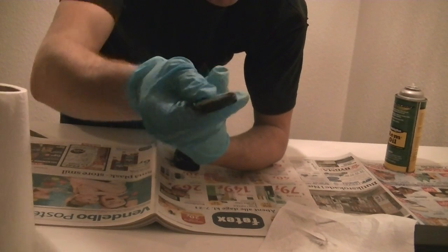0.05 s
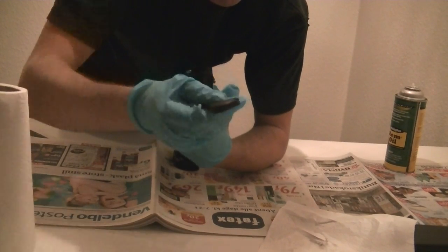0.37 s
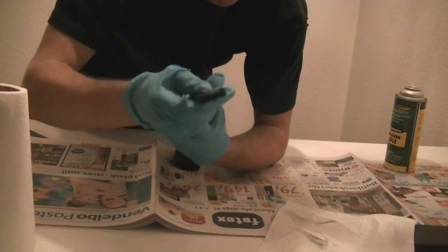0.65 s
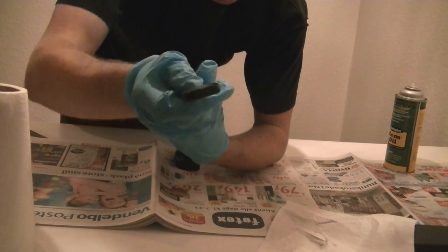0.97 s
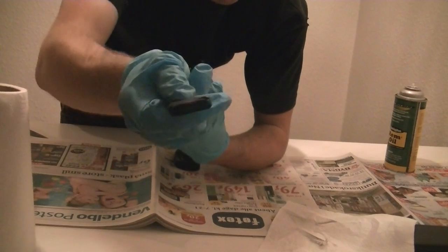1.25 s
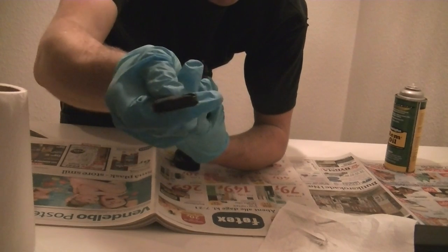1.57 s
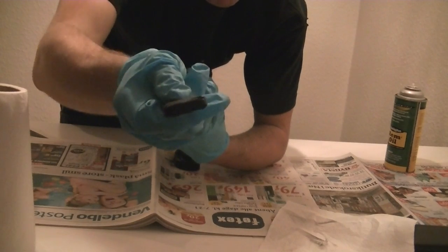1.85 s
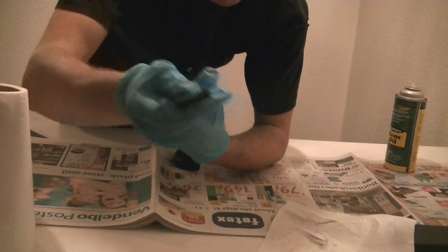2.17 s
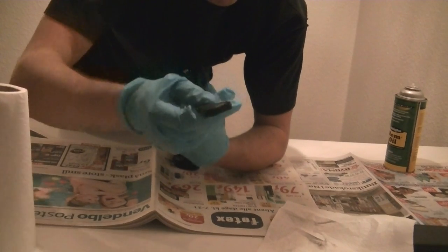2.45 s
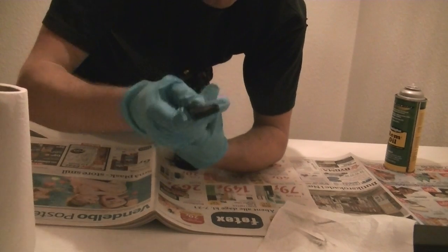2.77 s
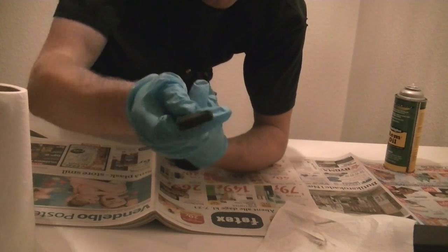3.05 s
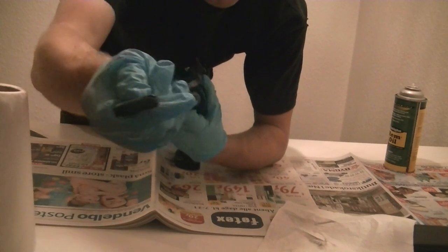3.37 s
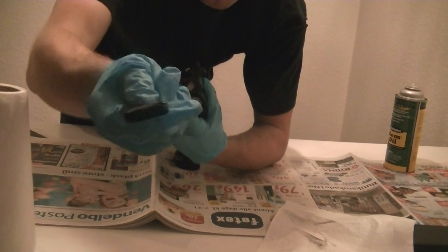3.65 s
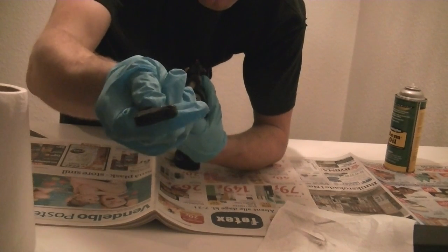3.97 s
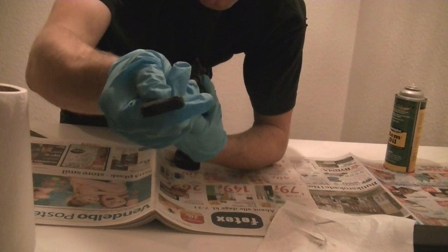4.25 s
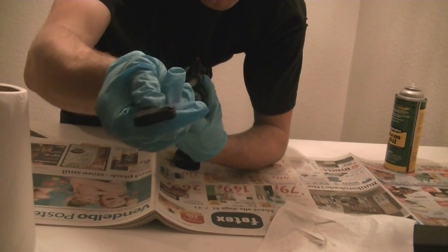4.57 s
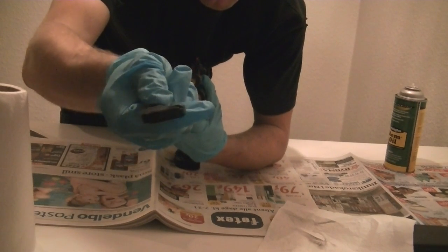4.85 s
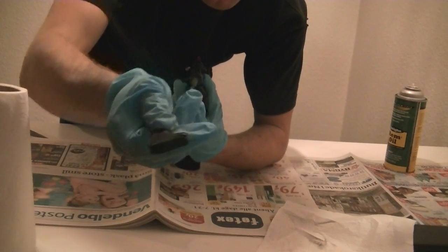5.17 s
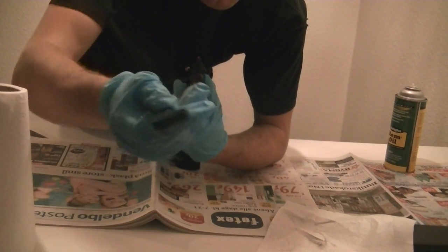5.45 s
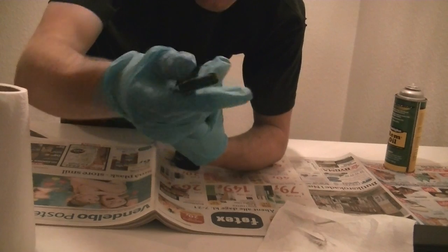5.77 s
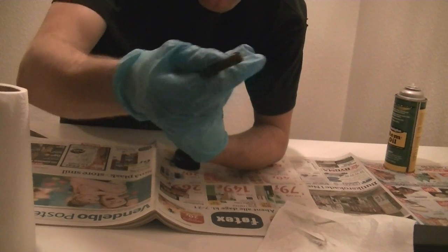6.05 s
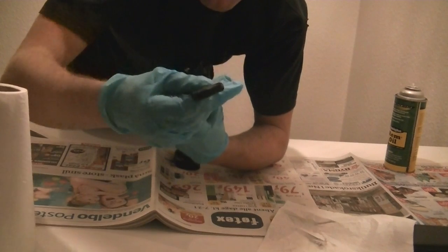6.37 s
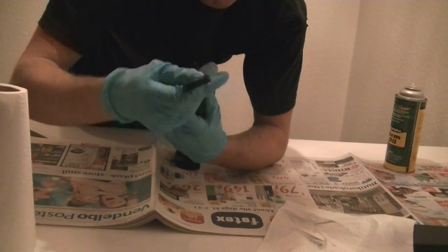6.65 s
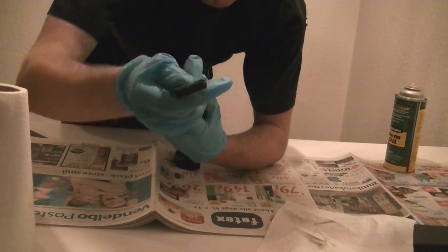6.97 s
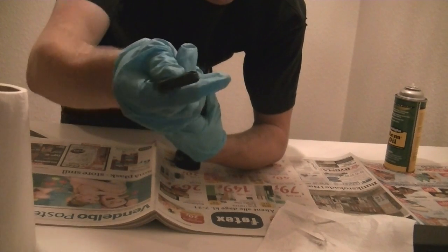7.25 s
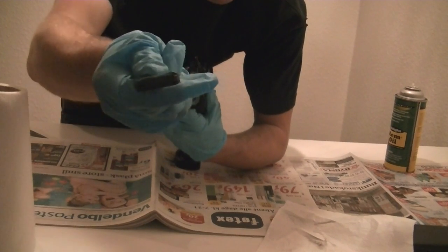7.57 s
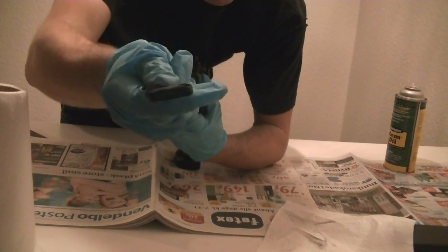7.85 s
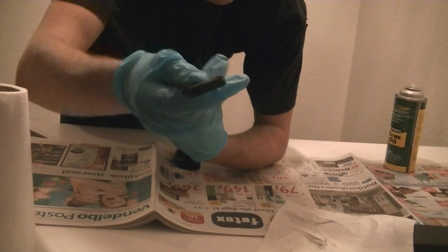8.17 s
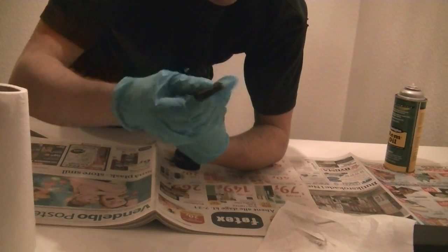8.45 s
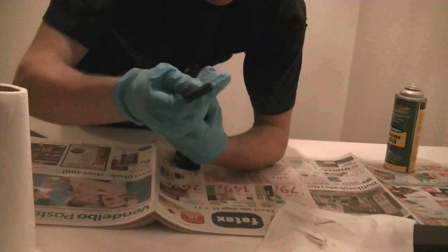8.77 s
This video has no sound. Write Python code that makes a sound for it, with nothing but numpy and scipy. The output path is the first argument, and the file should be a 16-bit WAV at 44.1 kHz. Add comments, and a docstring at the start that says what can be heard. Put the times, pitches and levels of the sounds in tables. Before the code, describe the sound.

A brush on a metal rod is pushed through an air pistol barrel and drawn back four times. Each push hisses and scrubs, ending in a sharp steel clack; each pull is a softer, gritty scrape. Midway the strokes pause for light ticks and dull handling knocks. Rubber gloves rustle and the pistol bumps the table faintly, all heard nearby in a small, slightly echoing room with a soft hiss.

```python
"""Hissing, scrubbing and sharp metal clacks: a brush on a rod cleans an air pistol barrel in four strokes.
The rod hisses and ticks against the muzzle, the bristles scrub the bore (the inside of the barrel),
and each push ends in a hard stop. Gloved hands rustle and bump, the table hums under the strokes,
and the small room echoes over a soft hiss."""
import sys
import numpy as np
from scipy import signal
from scipy.fft import rfft, irfft
from scipy.io import wavfile
from scipy.ndimage import map_coordinates

SR = 44100
rng = np.random.default_rng(int(sys.argv[2]) if len(sys.argv) > 2 else 0)


def store_pcm(level_fs):
    """Save levels as 16-bit WAV."""
    pcm = np.round(np.clip(level_fs, -1, 1) * 32767).astype(np.int16)
    wavfile.write(sys.argv[1], SR, np.atleast_2d(pcm).T)


N = 388521
T = np.arange(N) / SR
BITE_S, LET_GO_S = 0.0067, 0.015  # how quickly the brush grips and lets go

# The rod goes in. Each row: times in seconds of the start, the brush entering and the end,
# then levels in dB of slide, scrub, bristle crackle and chatter.
PUSHES = [(0.0, 0.073, .40, -65, -55.5, -65.5, -62), (1.87, 2.07, 2.72, -63.5, -59.5, -65.5, -68),
          (6.01, 6.096, 6.50, -65.5, -61.5, -69.5, -68), (7.97, 8.16, 8.4, -68, -58, -66.5, -62)]
# The rod comes back. Each row: times in seconds of the start, the brush leaving and the slide's end,
# then levels in dB of slide, scrub and crackle. The last row ends before it starts, so it has no slide.
PULLS = [(0.55, 1.13, 1.34, -64.5, -55.5, -69.5), (2.724, 3.117, 3.34, -62.5, -55, -66),
         (6.655, 7.25, 7.44, -65, -54.5, -70), (8.574, 9.1, 6.9, -73, -58.5, -61.5)]
# The hands take a new hold. Each row: start and end in seconds, then glove, palm and table levels in dB.
REGRIPS = [(3.605, 3.723, -73.5, -65.5, -77), (5.215, 5.702, -76.5, -67, -67),
           (5.804, 6.09, -71, -67.5, -74), (7.135, 7.69, -77, -65, -65), (7.72, 7.952, -67.5, -60.5, -74),
           (7.946, 8.266, -64, -58, -59.5), (8.26, 8.48, -62.5, -64, -80), (8.585, 8.836, -62, -66.5, -74)]
# The tones the pistol rings with. Each row: pitch in Hz, level in dB, fade time in seconds.
PISTOL_TONES = [(366, -23, 0.082), (495, -12.5, 0.07), (706, -5.5, 0.021), (786, -7.5, 0.039),
                (1040, -5, 0.045), (1303, -14, 0.04), (1412, -4.5, 0.016), (1630, -6, 0.027),
                (1766, -8, 0.021), (1908, -9.5, 0.016), (2196, -8, 0.029), (3283, -7.5, 0.024),
                (5600, -5, 0.018), (8720, -12, 0.025)]
# The sound of the sliding rod and of the palm. Each row: frequency in Hz, level in dB.
SLIDE_SPECTRUM = [(300, -20), (1500, -3), (3500, -8), (6000, 0), (8500, 0.5), (11000, -8), (16000, -18)]
PALM_SPECTRUM = [(60, -16), (200, -5), (420, -0.5), (750, -2), (1200, -4.5), (2500, -7.5), (6000, -35)]


def undb(db):
    """Turn decibels into a gain to multiply by."""
    return 10 ** (np.asarray(db) / 20)


def unit(x):
    """Scale a sound to an average (rms) level of 1."""
    return x / np.sqrt(np.mean(x ** 2))


def slope(points, hz):
    """Read between (Hz, value) points on a log-frequency axis."""
    point_hz, value = np.transpose(points)
    return np.interp(np.log(np.maximum(hz, 1)), np.log(point_hz), value)


def convolve(x, response):
    """Pass a sound through a filter, given as its response to one click."""
    return signal.oaconvolve(x, response)[:len(x)]


def colour(x, points, size=4096):
    """Shape a sound's spectrum to follow (Hz, dB) points."""
    cepstrum = irfft(np.log(undb(slope(points, np.fft.rfftfreq(size, 1 / SR)))))
    # folding onto the first half keeps the filter from sounding ahead of its input
    cepstrum[1:size // 2] *= 2
    cepstrum[size // 2 + 1:] = 0
    return convolve(x, irfft(np.exp(rfft(cepstrum))))


def resonate(x, peaks):
    """Add up one band of the sound for each resonance, with alternating signs."""
    return sum((-1) ** k * undb(db) * signal.lfilter(*signal.iirpeak(hz, hz / width, SR), x)
               for k, (hz, width, db) in enumerate(peaks))


def fade(t, t60):
    """Die away by 60 dB in t60 seconds, the fade time."""
    return np.exp(-np.log(1000) * t / t60)


def ping(t, hz, t60):
    """One fading tone."""
    return np.sin(2 * np.pi * hz * t) * fade(t, t60)


def burst(t, t60):
    """One fading puff of noise."""
    return rng.standard_normal(len(t)) * fade(t, t60)


def ring(t, tones, scatter):
    """Several fading tones, each a little out of tune and flipped at random."""
    chance = rng.standard_normal((len(tones), 2))
    return sum(undb(db) * np.sign(flip) * ping(t, hz * (1 + scatter * detune), t60)
               for (hz, db, t60), (detune, flip) in zip(tones, chance))


def walk(rate):
    """Wander at random by about 1 either way, with `rate` steps a second."""
    steps = rng.standard_normal(N // 100)
    return np.interp(T * rate, np.arange(len(steps)), steps)


def friction(rate, spread_db, smooth):
    """Rubbing: about `rate` tiny, uneven slips a second, over a share of smooth noise."""
    slips = (rng.random(N) < rate / SR) * rng.standard_normal(N)
    sizes = undb(spread_db * np.minimum(rng.exponential(size=N), np.pi))
    return unit(unit(slips * sizes) + smooth * rng.standard_normal(N))


def add(track, start_s, sound):
    """Mix a sound into a track at the given time."""
    start = int(start_s * SR)
    track[start:start + len(sound)] += sound[:N - start]


def gesture(start, end, db, attack_s=0.032, release_s=0.033):
    """The gain of one movement: it rises, holds and falls."""
    return undb(db) * np.clip(np.minimum((T - start) / attack_s, (end - T) / release_s), 0, 1)


def rod_speed(rise_db_per_s=7, sag_db_per_s=5):
    """The gains of sliding in and out: pushes speed up and grow louder, pulls slow down and soften."""
    # The rod is eased along, brush outside the bore. Each row: start and end in seconds, level in dB.
    nudges = [(4.968, 5.14, -71.5), (5.145, 5.456, -67.5)]
    pushes = sum(gesture(start, end, db, release_s=0.0036) * undb(rise_db_per_s * np.minimum(T - end, 0))
                 for start, _, end, db, *_ in PUSHES)
    pulls = sum(gesture(start, end, db) * undb(-sag_db_per_s * np.maximum(T - start, 0))
                for start, _, end, db, *_ in PULLS)
    return pushes + sum(gesture(*nudge) for nudge in nudges), pulls


def sliding_rod(ring_db=1.5, hiss_db=-1.5, pull_hiss_db=2, waver_db=2):
    """Fine slips on the muzzle keep the rod singing along its length; drawn back, it hisses more."""
    # The rod's resonances. Each row: pitch in Hz, width in Hz, level in dB.
    rod_peaks = [(4740, 270, 6), (7480, 210, 2.5), (8170, 1300, -11), (12900, 640, -21)]
    inward, outward = rod_speed()
    slips = friction(rate=6000, spread_db=-2.5, smooth=0.98) * undb(waver_db * walk(30))
    singing = undb(ring_db) * unit(resonate(slips, rod_peaks)) * (inward + outward)
    hiss = undb(hiss_db) * unit(colour(slips, SLIDE_SPECTRUM)) * (inward + undb(pull_hiss_db) * outward)
    return singing + hiss


def air(level_db=-60, waver_db=0.5):
    """Soft room noise and hiss that waver slightly."""
    # The noise's spectrum. Each row: frequency in Hz, level in dB.
    air_spectrum = [(12, -30), (20, -8), (59, -10.5), (88, -5), (247, -5.5), (284, -5.5), (419, -7.5),
                    (469, -7), (713, -11.5), (819, -11.5), (1180, -13), (2650, -15), (15800, -28.5)]
    # How unlike left and right are. Each row: frequency in Hz, side level in dB.
    air_width = [(60, -4), (110, -4.5), (200, -2), (380, -2.5), (700, -1), (1290, -2.5), (2380, -4.5),
                 (4400, -6.5), (8120, -10.5), (15000, -30)]
    mid, side = (unit(colour(rng.standard_normal(N), air_spectrum)) for _ in range(2))
    return undb(level_db + waver_db * walk(6)) * spread(mid, side, air_width)


def drag(loosen_db_per_s=11.5):
    """The gains of scrub and crackle as the brush drags: even on a push, loosening on a pull."""
    scrub, crackle = np.zeros(N), np.zeros(N)
    for _, enters, end, _, scrub_db, crackle_db, _ in PUSHES:
        force = gesture(enters, end, 0, BITE_S, LET_GO_S)
        scrub += undb(scrub_db) * force
        crackle += undb(crackle_db) * force
    for start, leaves, _, _, scrub_db, crackle_db in PULLS:
        loosening = undb(-loosen_db_per_s * np.maximum(T - start, 0))
        force = gesture(start, leaves, 0, BITE_S, LET_GO_S) * loosening
        scrub += undb(scrub_db) * force
        crackle += undb(crackle_db) * force
    return scrub, crackle


def rod_chatter(burst_db=7, grit_db=-3):
    """Pushed against the brush's drag, the rod bends and grabs the muzzle in short, gritty bursts."""
    # The chattering rod's resonances. Each row: pitch in Hz, width in Hz, level in dB.
    chatter_peaks = [(2380, 300, -0.5), (4500, 410, -0.5), (10900, 790, -17.5)]
    pressure = sum(gesture(enters, end, db, BITE_S, LET_GO_S) for _, enters, end, *_, db in PUSHES)
    grabs = undb(burst_db * np.minimum(walk(70), 2))
    rasp = grabs * unit(resonate(friction(rate=4000, spread_db=-3, smooth=.3), chatter_peaks))
    grit = unit(colour(friction(rate=250, spread_db=3, smooth=0), SLIDE_SPECTRUM))
    return pressure * (rasp + undb(grit_db) * grit)


def brush(scrub, bore_db=-1.5, catch_db=6, sizzle_db=-14, pitch_shift=0.075):
    """Bristles flick along the barrel's grooves and catch unevenly while their tips sizzle."""
    # The bore's resonances. Each row: pitch in Hz, width in Hz, level in dB.
    bore_peaks = [(756.4, 30, 5), (1003, 95, -1), (1665, 160, -13), (2080, 250, -11), (3410, 140, -8),
                  (4800, 160, -11)]
    # The sizzle of the tips. Each row: frequency in Hz, level in dB.
    sizzle_spectrum = [(3000, -22), (6000, -8), (7400, 0), (9500, 0), (11000, -8), (13200, -8),
                       (16000, -24)]
    flicks = friction(rate=2500, spread_db=1, smooth=.4) * undb(catch_db * np.minimum(walk(35), 1.3))
    # reading at a wandering speed shifts the resonances, as the moving brush does
    position = np.cumsum(1 + pitch_shift * walk(20))
    bore = unit(map_coordinates(resonate(flicks, bore_peaks), [position], order=3, mode="mirror"))
    tips = unit(colour(rng.standard_normal(N), sizzle_spectrum))
    return scrub * (undb(bore_db) * bore + undb(sizzle_db) * tips)


def bristle_chirps(scrub, level_db=-9, centre_hz=1900, wander_octaves=.3, flicker_db=7, rough=.12):
    """Tufts of bristles stick and slip in short, rough chirps of ever-changing pitch."""
    octaves = np.clip(wander_octaves * walk(25), -1, 1)
    pitch = centre_hz * 2 ** octaves * (1 + rough * walk(400))
    chirps = np.sin(2 * np.pi * np.cumsum(pitch) / SR) * undb(flicker_db * np.minimum(walk(40), 1))
    return undb(level_db) * scrub * unit(chirps * (1 + rough * rng.standard_normal(N)))


def crackle_and_hands(crackle, grit_db=2, palm_db=-1, patchy_db=7.5):
    """A gritty crackle as bristles are forced into the bore, and on pulls; gloves rub at each new hold."""
    # The gritty crackle. Each row: frequency in Hz, level in dB.
    grit_spectrum = [(200, -8), (700, 2), (2300, 0), (4200, -1), (6500, -6.5), (10000, -12), (16000, -42.5)]
    rubs = crackle + sum(gesture(start, end, db) for start, end, db, _, _ in REGRIPS)
    shifts = sum(gesture(start, end, db) for start, end, _, db, _ in REGRIPS)
    grit = unit(colour(friction(rate=2400, spread_db=2.5, smooth=.7), grit_spectrum)) * rubs
    palm = unit(colour(friction(rate=400, spread_db=-3.5, smooth=1.0), PALM_SPECTRUM)) * shifts
    return (undb(grit_db) * grit + undb(palm_db) * palm) * undb(patchy_db * np.minimum(walk(50), 1))


def table_hum(scrub, drag_db=-21, regrip_db=-6):
    """The pistol's butt judders on the table top as the brush drags and the hands shift."""
    # The table top's resonances. Each row: pitch in Hz, width in Hz, level in dB.
    table_peaks = [(92, 97, -10.5), (157, 34, -3.5), (212.3, 30, -6)]
    shifts = sum(gesture(start, end, db) for start, end, _, _, db in REGRIPS)
    load = undb(drag_db) * scrub + undb(regrip_db) * shifts
    return load * unit(resonate(friction(rate=150, spread_db=6, smooth=0.99), table_peaks))


def ticks(ring_db=-5, ring_t60=0.01, body_db=10, tap_db=13, snap_db=10):
    """Rod and brush tap the muzzle lightly: a short scrape, with a ring from the rod and the pistol."""
    # Each row: start in seconds, level in dB, rod pitch in Hz, pistol and scrape offsets in dB,
    # scrape fade time in seconds.
    taps = [(0.0743, -32.5, 4600, -18.5, -10.5, 0.027), (0.1222, -34, 4660, -38, -16, 0.027),
            (1.066, -43, 4250, -26, -8.5, 0.052), (1.6646, -50.5, 4300, -30, -10.5, 0.075),
            (2.054, -26, 4630, -23, -22, 0.026), (2.0652, -21.5, 4740, -26.5, -19.5, 0.037),
            (2.0867, -30, 4600, -28, -15, 0.025), (3.102, -35, 5030, -37, -14.5, 0.045),
            (3.134, -31.5, 4540, -47, -21, 0.057), (3.8189, -33, 4850, -24, -24, 0.025),
            (4.0682, -42, 4670, -33, -20, 0.02), (4.0813, -30, 4560, -30, -17.5, 0.019),
            (4.692, -49, 4600, -18, -14, 0.04), (5.4494, -23.5, 4670, -34, -21, 0.038),
            (6.114, -27, 4500, -20, -14, 0.01), (7.4658, -29.5, 4500, -43, -14, 0.029),
            (7.806, -44.5, 4700, -33, -12, 0.087), (8.071, -43.5, 4670, -10.5, -18, 0.025),
            (8.1442, -35, 4760, -15, -18, 0.018), (8.1522, -25.5, 4500, -23, -17.5, 0.064),
            (8.1697, -10.5, 4880, -30.5, -21.5, 0.018), (8.1956, -29.5, 4800, -15, -15.5, 0.13)]
    # The scrape of a tap. Each row: frequency in Hz, level in dB.
    tap_spectrum = [(100, -42), (600, -12), (1700, -5), (3200, 2), (5000, -1.5), (6500, -7), (9500, -8),
                    (13000, -22), (16000, -57)]
    out, t = np.zeros(N), T[:SR // 8]
    for start, db, hz, pistol_db, scrape_db, scrape_t60 in taps:
        rod = undb(ring_db) * ping(t, hz, ring_t60)
        contact = burst(t, scrape_t60)
        contact[0] += undb(snap_db)
        scrape = undb(tap_db + scrape_db) * colour(contact, tap_spectrum)
        pistol = undb(body_db + pistol_db) * ring(t, PISTOL_TONES, scatter=0.04)
        add(out, start, undb(db) * (rod + scrape + pistol))
    return out


def squeaks(half_width=0.06):
    """Under pressure, bristles and rod stick and slip for a moment at one rough, gliding pitch."""
    # Each row: start and length in seconds, level in dB, pitch in Hz, glide in octaves.
    squeals = [(0.165, 0.021, -53, 4320, 0.023), (0.243, 0.02, -54, 2530, -0.18),
               (0.306, 0.044, -61, 2090, -.5), (0.647, 0.098, -60, 1000, 0),
               (0.874, .043, -63, 1000, 0.074), (2.116, 0.021, -49, 4680, 0), (2.222, 0.021, -55, 4640, 0),
               (2.245, 0.071, -66, 10900, -.14), (2.396, 0.0315, -53.5, 783, 0.02),
               (2.893, 0.1, -59, 2000, 0.27), (3.029, 0.023, -54, 2240, 0.04),
               (6.077, 0.15, -67.5, 11000, -.12), (6.117, 0.1, -55.5, 752, -0.01),
               (6.298, 0.065, -68, 10900, 0), (6.304, .067, -57, 4320, -0.089),
               (6.455, 0.056, -51, 4640, -0.2), (6.451, 0.05, -59, 11000, -0.078),
               (8.318, 0.068, -55.5, 9900, -.1), (8.349, .031, -50, 4460, .06),
               (8.684, 0.051, -51, 2690, .13)]
    out = np.zeros(N)
    for start, length, db, hz, glide in squeals:
        swell = signal.windows.tukey(int(length * SR))
        pitch = hz * 2 ** (glide * np.linspace(-.5, .5, len(swell)))
        tone = np.exp(2j * np.pi * np.cumsum(pitch) / SR)
        # uneven slips shake the tone's size and timing, blurring it by a share of its pitch
        noise = rng.standard_normal(SR // 2) + 1j * rng.standard_normal(SR // 2)
        shake = signal.lfilter(*signal.butter(2, hz * half_width, fs=SR), noise)[-len(swell):]
        add(out, start, undb(db) * swell * unit(np.real(shake * tone)))
    return out


def thumps(t60=0.13, rise_s=0.004):
    """The pistol's butt bumps the table, and a soft low tone swells briefly in the top."""
    # Each row: start in seconds, level in dB, pitch in Hz.
    table_bumps = [(0.183, -50.5, 157), (0.405, -46, 192), (2.07, -45, 94), (2.111, -52.5, 155),
                   (2.333, -49.5, 157), (2.565, -53, 166), (5.451, -45, 91), (5.453, -62, 168),
                   (6.12, -42, 139), (7.98, -50.5, 70), (8.472, -44.5, 157)]
    out, t = np.zeros(N), T[:SR // 2]
    for start, db, hz in table_bumps:
        add(out, start, undb(db) * ping(t, hz, t60) * (1 - np.exp(-t / rise_s)))
    return out


def stops(second_tone_db=-21, contact_db=-12, snap_db=12, clack_db=-6.5, body_db=-5, spread_s=0.00087):
    """The rod hits its stop, steel on steel: a snap and a short ring, then the blow shakes the pistol."""
    # Hits and rebounds. Each row: start in seconds, level in dB, rod pitch in Hz,
    # pistol and crack offsets in dB.
    hits = [(0.3987, -17, 5000, 0.5, 4.5), (0.4124, -38, 5000, -11, 23.5), (2.5588, -17, 4930, 2.5, 5.5),
            (2.5655, -41, 5000, 16, -6), (6.4988, -18.5, 4900, 4.5, 7.5), (6.5093, -35.5, 4800, -18, 16),
            (6.5103, -38, 4680, -8, 5), (6.5200, -42, 4680, -10, 25), (8.4671, -16.5, 4960, 3, 8),
            (8.4725, -28, 5000, -10, 16.5)]
    # The crack of steel and the clack of loose parts. Each row: frequency in Hz, level in dB.
    crack_spectrum = [(100, -52), (400, 3), (2000, 8), (2800, 1.5), (4200, 6.5), (6500, -2), (8500, 0.5),
                      (12000, -4.5), (16000, -25)]
    clack_spectrum = [(60, -26), (170, -1), (300, -9), (480, -2), (640, -5), (1000, 1), (2200, -1),
                      (2800, -6), (3500, -4), (6500, -13), (15000, -30)]
    out, t = np.zeros(N), T[:SR // 5]
    for start, db, hz, pistol_db, crack_db in hits:
        rod = ping(t, hz, t60=0.022) + undb(second_tone_db) * ping(t, hz * .965, t60=0.1)
        contact = undb(contact_db + crack_db) * burst(t, t60=0.026)
        contact[0] -= undb(snap_db)
        clack = undb(clack_db) * colour(burst(t, t60=0.046), clack_spectrum)
        body = undb(body_db) * ring(t, PISTOL_TONES, scatter=0.0063)
        pistol = undb(pistol_db) * (body + clack) * (1 - np.exp(-t / spread_s))
        add(out, start, undb(db) * (rod + colour(contact, crack_spectrum) + pistol))
    return out


def knocks(tone_db=-5, tone_cycles=26, thud_db=4, thud_t60=0.059):
    """Dull, hollow knocks from handling and from the brush reversing in the bore: a tone over a thud."""
    # Each row: start in seconds, level in dB, pitch in Hz.
    dull_knocks = [(0.402, -29.5, 495), (2.562, -29.5, 506), (2.716, -41, 895), (3.617, -42, 382),
                   (3.645, -51, 450), (3.817, -42.5, 495), (4.095, -36, 957), (4.635, -50, 760),
                   (5.447, -38, 1630), (5.452, -38, 990), (5.834, -48, 2050), (6.05, -44, 384),
                   (6.113, -42, 366), (6.622, -48, 785), (6.644, -37, 880), (6.795, -46, 940),
                   (7.218, -50.5, 533), (7.401, -41.5, 1560), (7.74, -37.5, 2060), (8.069, -54, 710),
                   (8.47, -32, 480), (8.612, -34, 755)]
    out, t = np.zeros(N), T[:SR // 8]
    for start, db, hz in dull_knocks:
        tone = undb(tone_db) * ping(t, hz, tone_cycles / hz)  # high tones die sooner
        thud = undb(thud_db) * colour(burst(t, thud_t60), PALM_SPECTRUM)
        add(out, start, undb(db) * (tone + thud))
    return out


def glove_swish():
    """Rubber slides quickly over the handle as the fingers open."""
    # The sliding glove's hiss. Each row: frequency in Hz, level in dB.
    swish_spectrum = [(600, -15), (1500, -5), (2300, 0), (4500, -1), (7000, -8.5), (11000, -7),
                      (15500, -25)]
    rubber = unit(colour(friction(rate=5000, spread_db=1.5, smooth=.9), swish_spectrum))
    return gesture(start=5.71, end=5.82, db=-51, attack_s=0.014, release_s=0.06) * rubber


def spread(mid, side, width):
    """Make stereo: the side sound is added on the left and taken away on the right."""
    return mid + colour(side, width) * np.array([[1], [-1]])


def wall_echoes(t, build_s=0.0016):
    """Echoes from the walls blur into fading noise; the highest treble dies first."""
    # Each row: frequency in Hz, level in dB, fade time in seconds.
    echo_bands = [(99, 0, 0.25), (390, 2, 0.3), (1000, -2, 0.4), (2350, -3, 0.45), (5000, -7.5, 0.44),
                  (8100, -4, 0.3), (11800, -19.5, 0.19), (14700, -22, .2)]
    noise = rfft(rng.standard_normal(len(t)))
    hz = np.fft.rfftfreq(len(t), 1 / SR)
    out = 0
    for k, (_, db, t60) in enumerate(echo_bands):
        band = slope([(row[0], j == k) for j, row in enumerate(echo_bands)], hz)
        shape = fade(t, t60) * (1 - np.exp(-(t / build_s) ** 2))
        out += undb(db) * irfft(noise * band, len(t)) * shape / np.sqrt(np.sum(shape ** 2))
    return out


def room(x, echo_s=.0033, echo_db=-8, echo_cutoff_hz=3500, rings_db=-55, lead_samples=0.11):
    """A quick dull echo from a near surface, then the walls and the ringing furniture."""
    # The table and the things on it. Each row: pitch in Hz, level in dB, fade time in seconds.
    furniture_tones = [(157, 3, .7), (216, 2, .55), (344, -9, .4), (496, -12, .35), (790, -4, .4),
                       (1079, -11, .3), (1442, -9, .5), (1637, -8, .45), (1797, -10, .4)]
    # How unlike the left and right echoes are. Each row: frequency in Hz, side level in dB.
    echo_width = [(30, 1), (100, -28), (250, -35), (900, -30), (12000, -11.5)]
    t = T[:SR]
    early = np.zeros(N)
    add(early, echo_s, undb(echo_db) * signal.lfilter(*signal.butter(1, echo_cutoff_hz, fs=SR), x))
    late = wall_echoes(t) + undb(rings_db) * ring(t, furniture_tones, scatter=0.00042)
    # the direct sound arrives a little sooner on the left
    direct = x + lead_samples * np.gradient(x) * np.array([[1], [-1]])
    return direct + spread(early + convolve(x, late), convolve(x, wall_echoes(t)), echo_width)


def scene():
    """All the work at the table, heard in the room."""
    scrub, crackle = drag()
    blows = stops() + ticks() + knocks() + thumps()
    rubbing = sliding_rod() + rod_chatter() + brush(scrub) + bristle_chirps(scrub) + squeaks()
    rubbing += crackle_and_hands(crackle) + glove_swish() + table_hum(scrub)
    return room(blows + rubbing) + air()


def record(dry):
    """Cut off the very top of the treble, above 15900 Hz."""
    return signal.sosfilt(signal.ellip(10, .2, 70, 15900, fs=SR, output="sos"), dry)


dry = scene()
out = record(dry)
store_pcm(out)
```